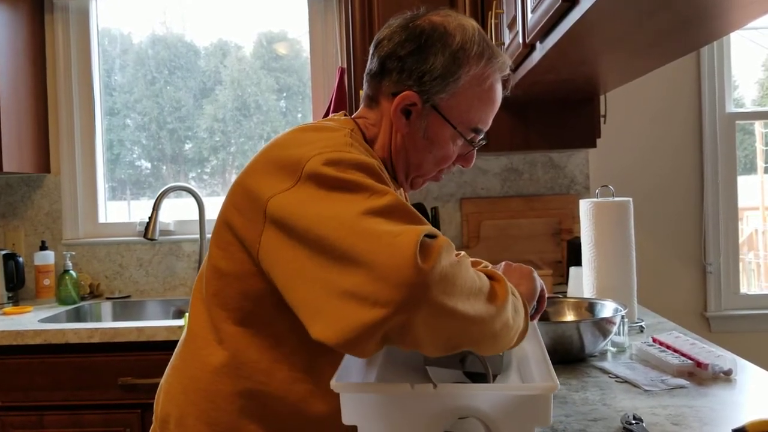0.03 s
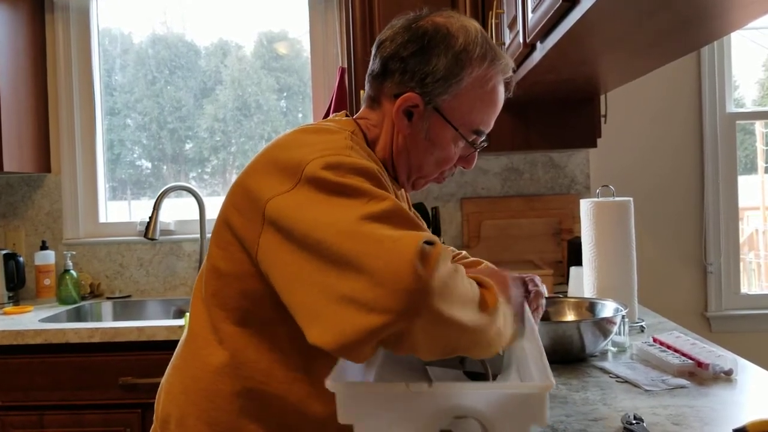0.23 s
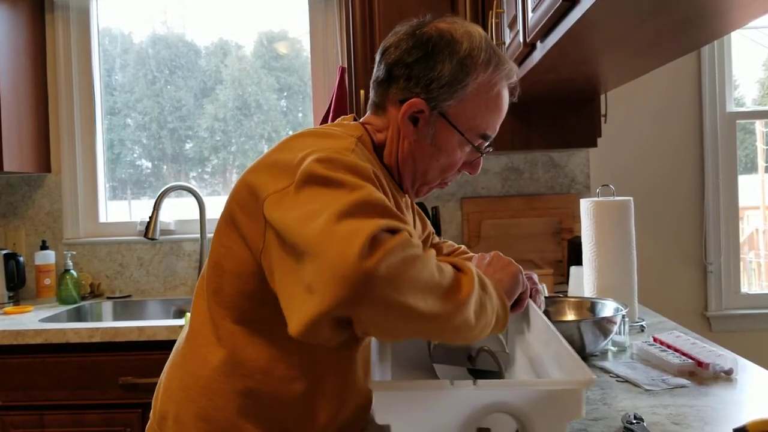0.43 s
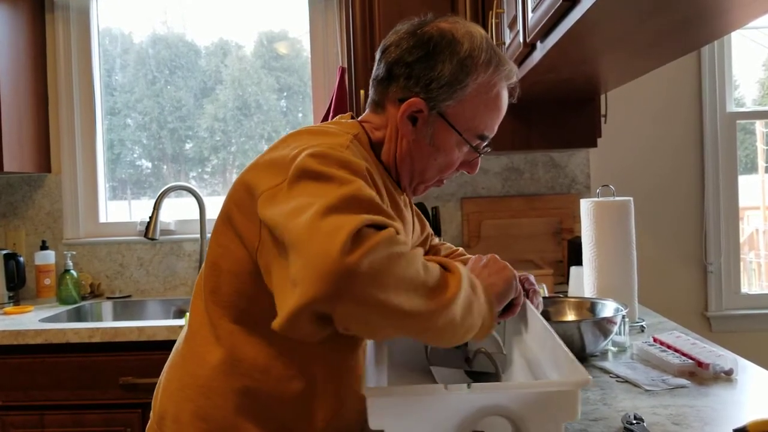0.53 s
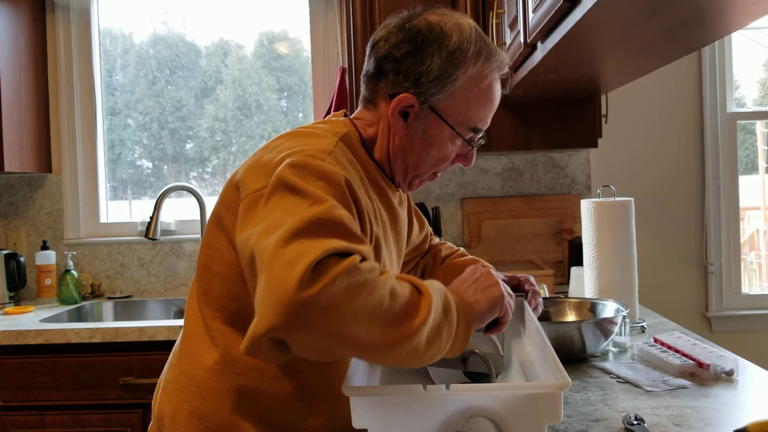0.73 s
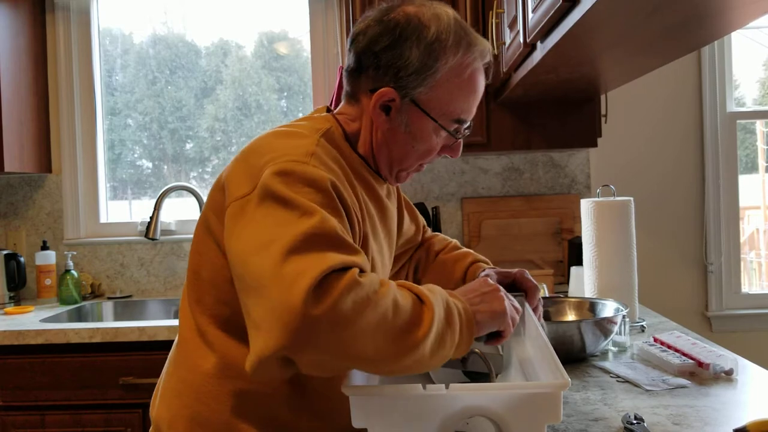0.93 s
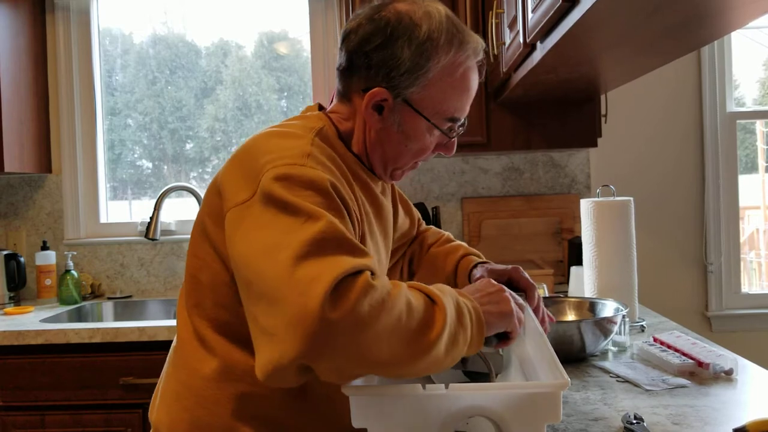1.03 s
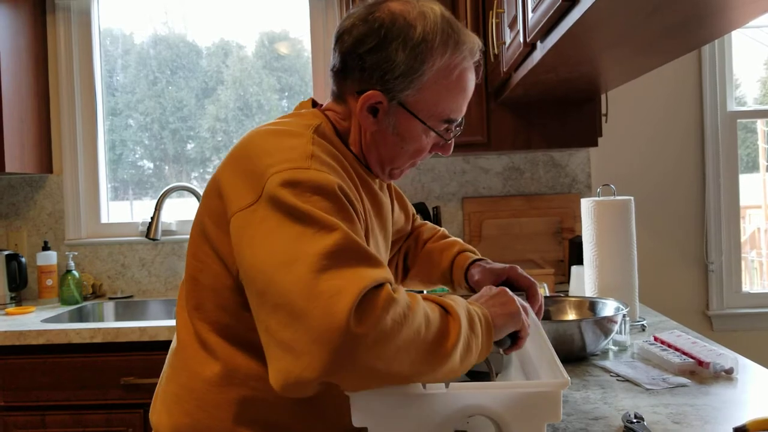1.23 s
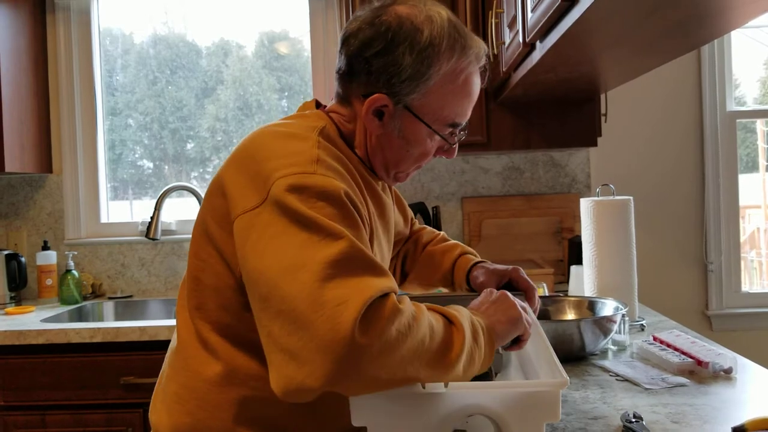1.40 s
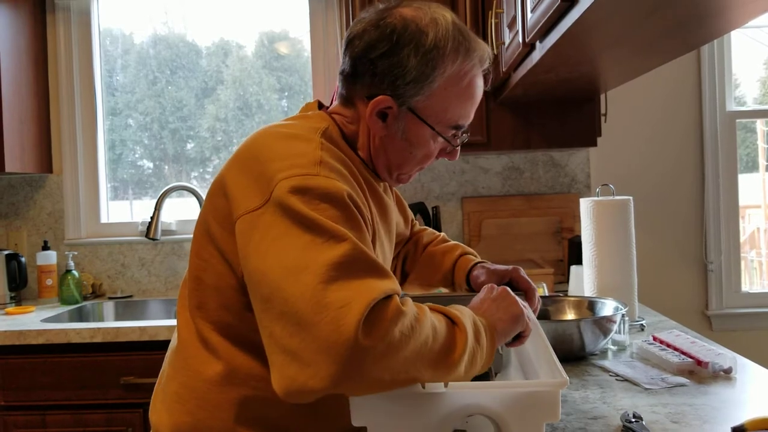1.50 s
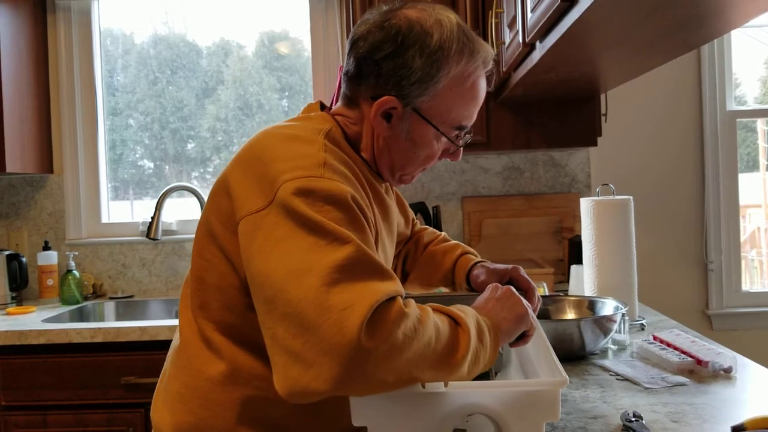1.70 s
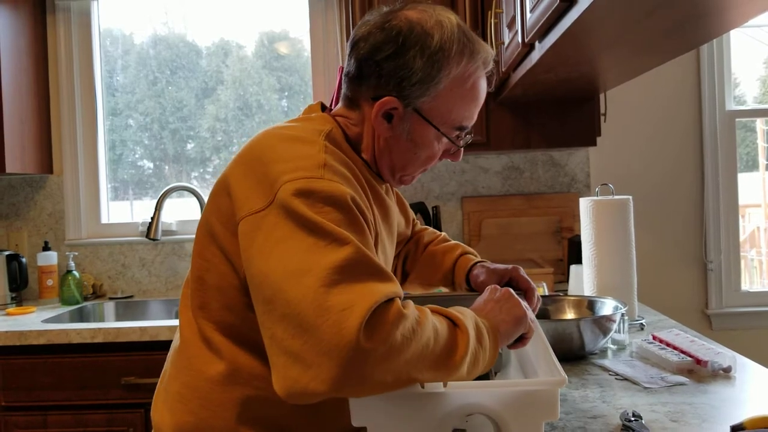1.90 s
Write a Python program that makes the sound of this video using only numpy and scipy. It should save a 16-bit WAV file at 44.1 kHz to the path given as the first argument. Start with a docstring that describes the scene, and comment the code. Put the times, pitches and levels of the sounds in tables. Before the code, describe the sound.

A plastic bin clatters as a part snaps loose, rattles against the walls and lands with a thud and small clink. Faint rubbing and a few soft bumps follow, close by in a quiet kitchen.

```python
"""Parts worked loose in a plastic ice bin on a kitchen counter, heard with the cupboards close by.
Over low room rumble, hands rub the bin and bump it once. At 0.2 s a part snaps free, clatters against
the walls and drops with a thud and a clink; the kitchen rings briefly. From 0.9 s a sleeve brushes
the rim twice and the hands rub again; from 1.6 s come a few soft bumps on the gripped bin.
Throughout, the left microphone is hissy and much weaker than the right."""
import sys
import numpy as np
from scipy import signal
from scipy.fft import rfft, irfft
from scipy.io import wavfile
from scipy.ndimage import uniform_filter1d

SR = 44100
rng = np.random.default_rng(int(sys.argv[2]) if len(sys.argv) > 2 else 0)


def master(y):
    """Save y as 16-bit WAV."""
    cut = np.clip(np.atleast_2d(y).T, -1, 1)
    pcm = np.round(cut * 32767)  # scale
    wavfile.write(sys.argv[1], SR, pcm.astype(np.int16))


N = 85995


def amp(db):
    """Decibels to gain."""
    return 10 ** (np.asarray(db) / 20)


def read(points, hz):
    """Reads a table on a log-frequency axis."""
    f, value = np.transpose(points)
    return np.interp(np.log(hz + 1), np.log(f + 1), value)


def add(mix, start_s, sound):
    """Adds a two-channel sound to the mix in place."""
    part = mix[:, max(round(start_s * SR), 0):][:, :sound.shape[-1]]
    part += sound[..., :part.shape[1]]


def unit_energy(x):
    """Scales each channel to an energy of one."""
    return x / np.linalg.norm(x, axis=1)[:, None]


def colour(x, gain_db, size=2048):
    """Minimum-phase filter whose gain in dB is a function of frequency."""
    log_gain = np.log(amp(gain_db(abs(np.fft.fftfreq(size, 1 / SR)))))
    response = np.exp(np.conj(signal.hilbert(log_gain)))
    taps = np.fft.ifft(response).real
    return signal.fftconvolve(x, taps[None, :size // 2], axes=1)


def wash(spectrum, patch_db=2):
    """Stereo noise near unit RMS with a given colour and drifting louder and softer patches."""
    frames, hz = N // 256 + 5, np.fft.rfftfreq(1024, 1 / SR)
    real, imag = rng.standard_normal((2, 2, frames, len(hz)))
    patches = uniform_filter1d(rng.standard_normal((frames, len(hz))), size=10, axis=0)
    patches = uniform_filter1d(patches, size=8, axis=1)
    bins = (real + 1j * imag) * amp(read(spectrum, hz) + patch_db * patches / patches.std())
    noise = signal.istft(bins.transpose(0, 2, 1), nperseg=1024, noverlap=768)[1][:, :N]
    return noise / noise[1].std()


def friction(strokes, spectrum):
    """Sliding contact: noise swells and fades in a half sine for each stroke."""
    t = np.arange(N) / SR
    swells = sum(amp(db) * np.sin(np.pi * np.clip((t - start) / length, 0, 1))
                 for start, length, db in strokes)
    return swells * wash(spectrum)


def ring(modes, rise_s=0.0028, spread_db=3.5):
    """Dying sines of one struck object; their balance changes at random from hit to hit."""
    t = np.arange(SR // 2) / SR
    hz, db, t60 = np.transpose(modes)[:, :, None]
    phase = rng.random((2, len(modes), 1))
    db = db + spread_db * rng.standard_normal(db.shape)
    waves = np.sin(2 * np.pi * (hz * t + phase)) * amp(db) * np.exp(-np.log(1000) * t / t60)
    return waves.sum(1) * (1 - np.exp(-t / rise_s))


def cupboards(x, span_s=0.017, echoes_per_s=900):
    """Early reflections off the nearby counter and cupboards, different for each contact."""
    t = np.arange(SR // 20) / SR
    taps = rng.standard_normal((2, len(t)))
    taps *= (rng.random((2, len(t))) < echoes_per_s / SR) * (t < span_s)
    return signal.fftconvolve(x, unit_energy(taps), axes=1)[:, :x.shape[1]]


def knock(shell, modes, chatter_s, thud_db, body_db, clack_db, snap_db, ring_db):
    """A first contact and a dying chatter of tiny ones excite the plastic; its strongest modes ring on."""
    # where the blow's levels apply, f/Hz: thud, body (two points), clack (two points), snap
    band_hz = [130, 260, 950, 1700, 4300, 7500]
    bands = list(zip(band_hz, [thud_db, body_db, body_db, clack_db, clack_db, snap_db]))
    crack_s, grain_db, shell_db, modes_db = 0.0035, 3, 18, -23
    t = np.arange(SR // 5) / SR
    grains = rng.choice([-1., 1.], (2, len(t)))
    grains *= amp(grain_db * np.minimum(rng.exponential(1, grains.shape), 4))
    crack = unit_energy(grains * np.exp(-t / crack_s))
    chatter = unit_energy(grains * np.exp(-t / chatter_s))
    force = 0.18 * crack + chatter
    force += amp(-1.5) * cupboards(force)
    sound = amp(modes_db + ring_db) * ring(modes)
    add(sound, 0, colour(force, lambda hz: shell_db + read(shell, hz) + read(bands, hz)))
    return sound


def room_tone():
    """The kitchen's low rumble with a trace of microphone hiss."""
    # noise floor: f/Hz, relative level/dB
    spectrum = [(20, -18.5), (60, -2), (110, -5), (190, 2), (330, -4.5), (480, -5.5), (620, -14),
                (1100, -25.5), (2400, -29), (4000, -28.5), (5500, -39), (9000, -46.5), (10800, -35.5),
                (12500, -28.5), (15500, -38)]
    return amp(-60) * wash(spectrum)


def hand_rubs():
    """Hands slide on the plastic with a low, dull friction noise."""
    # hand strokes: start t/s, length/s, peak level/dB
    strokes = [(-0.25, 0.61, -50.5), (1.105, 0.879, -63)]
    # colour of skin on plastic: f/Hz, relative level/dB
    spectrum = [(25, -12), (60, 4.5), (220, 1.5), (360, -4), (480, 0), (620, -9.5), (800, -13), (1300, -20),
                (3500, -23.5), (5500, -41.5), (9000, -46.5), (12500, -31.5), (16000, -32)]
    return friction(strokes, spectrum)


def soft_bumps(mix):
    """Light bumps on the bin, which the grip damps to a short, hollow ring."""
    # bumps: t/s, scuff decay/s, then relative level/dB of thud, body, clack, snap, hollow ring
    bumps = [(0.001, 0.01736, -57.5, -34.5, -45, -62, -24.5),
             (1.612, 0.0113, -38.5, -28, -25.5, -34.5, -40), (1.623, 0.00558, -32.5, -23, -37, -45, -31),
             (1.689, 0.008, -40, -36.5, -39, -55.5, -28.5), (1.748, 0.012, -31, -38, -34, -64, -19),
             (1.781, 0.0148, -29, -35.5, -41.5, -56.5, -24.5),
             (1.798, 0.011, -36.5, -38.5, -46.5, -60, -26.5), (1.856, 0.006, -34, -41, -39, -50, -22.5),
             (1.867, 0.00453, -44, -34.5, -42, -56.5, -30)]
    # dense resonance of the gripped bin: f/Hz, relative level/dB
    gripped_shell = [(30, -12.5), (70, -4), (160, -3), (290, -4.5), (420, 1), (600, 6.5), (830, 5),
                     (1200, -1.5), (2000, 3.5), (3000, -5.5), (4200, -15.5), (5500, -22.5), (8500, -31.5),
                     (12500, -26.5), (16000, -36)]
    # its hollow modes: f/Hz, relative level/dB, T60/s
    hollow_modes = [(343.38, -4, 0.06), (373.06, -0.5, 0.073), (425.4, 1.5, .08), (487, -6, 0.1),
                    (585, -4, .07), (800, -9.5, .08)]
    for start_s, *blow in bumps:
        add(mix, start_s, knock(gripped_shell, hollow_modes, *blow))


def clatter(mix):
    """The part snaps free, strikes the bin's walls in quick succession and lands with a thud."""
    # blows: t/s, chatter decay/s, then relative level/dB of thud, body, clack, snap, wall ring
    blows = [(0.2131, 0.0089, -30.5, -19, -21.5, -36, -13.5), (0.2180, 0.0091, -5, -8, -13, -11, -7),
             (0.2228, 0.0065, -14.5, -3, -8.5, -13, -9.5), (0.236, 0.007, -15, 0, 3, 3, -1),
             (0.2425, 0.00645, -15.5, -4, -3, -8, 0.5), (0.2490, 0.0208, -9.5, 5, -1.5, -3.5, -1.5),
             (0.2590, 0.016, -6, -3.5, -7.5, 0.5, -2.5), (0.2810, 0.0089, -16, -15.5, -14.5, -9, -18),
             (0.297, 0.002, -21.5, -17, -16.5, -12, -21.5), (0.32, 0.0087, -14.5, -10.5, -10.5, -20, -15.5),
             (0.3330, 0.016, -19, -9.5, -17, -11.5, -13.5), (0.3440, 0.0056, -12.5, -8.5, -15.5, -4, -22),
             (0.3580, 0.011, -29, -11.5, -12, -10, -17), (0.408, 0.01, -5, -18, -34, -58.5, -26),
             (0.413, 0.01, -8, -9, -14, -13.5, -14), (0.4360, 0.0156, -0.5, -10, -29.5, -24, -19.5),
             (0.4520, 0.0064, -17.5, -7.5, -29.5, -37.5, -28.5),
             (0.4880, 0.00567, -28, -25.5, -27, -47, -46.5), (0.529, 0.0279, -32.5, -36, -33.5, -39, -50.5),
             (0.545, .012, -49.5, -46.5, -39.5, -58.5, -41.5)]
    # dense resonance of the plastic: f/Hz, relative level/dB
    shell = [(30, -29), (75, -5), (160, -4), (300, -6.5), (480, -0.5), (660, -4.5), (820, 1.5),
             (1200, -0.5), (2000, 2), (3000, 1), (4200, -5.5), (5100, -12.5), (7000, -18.5), (9400, -23),
             (11000, -13), (12500, -6.5), (14200, -16), (15600, -19.5), (17000, -44)]
    # modes of the walls: f/Hz, relative level/dB, T60/s
    wall_modes = [(223.7, -13, 0.2), (306, -14, 0.45), (450, 0, .13), (490, -4, .22), (603, 8, 0.08),
                  (735, -1, .1), (852, -5, 0.22), (1021, -10, 0.17), (1081, -9, 0.13), (1388, -7, .2),
                  (1940, -9, 0.12), (2175, -10, .13), (2651, -2, 0.12), (3078, 1, 0.1), (3409, -3, 0.13),
                  (3813, -7, 0.1)]
    for start_s, *blow in blows:
        add(mix, start_s, knock(shell, wall_modes, *blow))


def clink(mix):
    """The hard inner part rings high and short as it lands."""
    # landing: t/s, level/dB
    hits = [(0.4126, -32.5)]
    # modes of the part: f/Hz, relative level/dB, T60/s
    part_modes = [(2253, 5, 0.041), (4156, 9, 0.03), (5480, 1, .02), (5680, 1, 0.016), (5950, 0, .014)]
    for start_s, db in hits:
        add(mix, start_s, amp(db) * ring(part_modes, rise_s=0.00037))


def sleeve_swishes():
    """Cloth brushes over the rim with a faint, bright friction noise."""
    # sleeve strokes: start t/s, length/s, peak level/dB
    strokes = [(0.87, 0.16, -74.5), (1.12, 0.2743, -62)]
    # colour of cloth on the rim: f/Hz, relative level/dB
    spectrum = [(500, -12), (1700, -9.5), (2200, -0.5), (3500, -5.5), (4700, 0), (6600, -13.5),
                (8300, -28.5), (12600, -6.5), (16000, -18)]
    return friction(strokes, spectrum)


def kitchen_reverb(x, build_s=0.013, echoes_per_s=4000):
    """Sparse room reflections build up, then each band dies at its own speed."""
    # decay of the kitchen: f/Hz, T60/s
    room_t60 = [(60, 0.45), (250, 0.48), (700, 0.4), (2000, 0.41), (5000, 0.35), (9000, 0.36),
                (15000, 0.09)]
    t = np.arange(SR * 3 // 4) / SR
    taps = rng.choice([-1., 1.], (2, len(t))) * (rng.random((2, len(t))) < echoes_per_s / SR)
    taps *= 1 - np.exp(-t / build_s)
    hz, frame_s, bins = signal.stft(taps, SR, nperseg=256)
    decay = np.exp(-np.log(1000) * frame_s / read(room_t60, hz)[:, None])
    tail = signal.istft(bins * decay, SR, nperseg=256)[1]
    return signal.fftconvolve(x, tail / np.linalg.norm(tail[1]), axes=1)[:, :N]


def scene():
    """The impacts and their echo in the kitchen, over rubbing and room tone."""
    impacts = np.zeros((2, N))
    clatter(impacts)
    clink(impacts)
    soft_bumps(impacts)
    rubbing = hand_rubs() + sleeve_swishes()
    return impacts + amp(-7.5) * kitchen_reverb(impacts) + rubbing + room_tone()


def record(dry):
    """Stereo pair: the weak, hissy left microphone shares its bass with the right; both end at 16 kHz."""
    # response of the left microphone: f/Hz, level/dB
    left_response = [(60, -24), (380, -22), (700, -20), (1290, -20), (2380, -22.5), (4400, -20.5),
                     (8000, -22.5), (15000, -24)]
    # likeness of the two channels: f/Hz, share of the right in the left (0-1)
    likeness = [(60, 1), (300, 1), (600, 0.5), (1200, 0), (15000, 0.4)]
    # self-noise of the left microphone: f/Hz, relative level/dB
    hiss = [(20, -10), (80, -4.5), (250, -12), (480, -11), (600, -12), (1000, -15.5), (1300, -1.5),
            (2400, 1), (4000, -1.5), (4700, -11), (5600, -21), (9800, -31.5), (10600, -16), (15500, -16.5)]
    hz = np.fft.rfftfreq(2 * N, 1 / SR)
    left_bins, right_bins = rfft(dry, 2 * N)
    shared = read(likeness, hz)
    blend = shared * right_bins + np.sqrt(1 - shared ** 2) * left_bins
    left = irfft(amp(read(left_response, hz)) * blend)[:N]
    left += amp(-70.5) * wash(hiss)[1]
    lowpass = signal.firwin(201, cutoff=16050, window=("kaiser", 9), fs=SR)
    return signal.oaconvolve(np.array([left, dry[1]]), lowpass[None], "same")


dry = scene()
out = record(dry)
master(out)
```